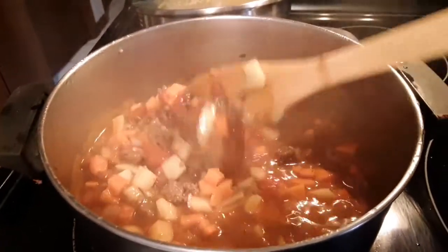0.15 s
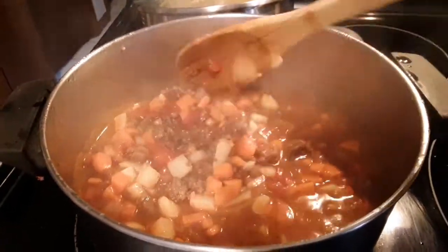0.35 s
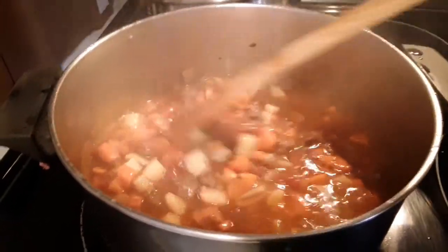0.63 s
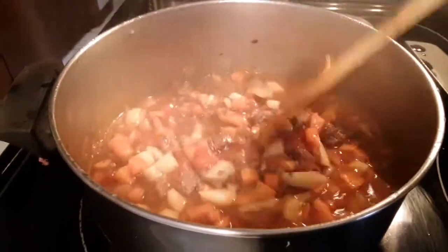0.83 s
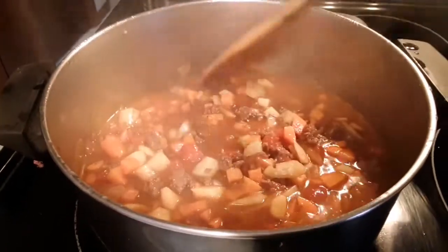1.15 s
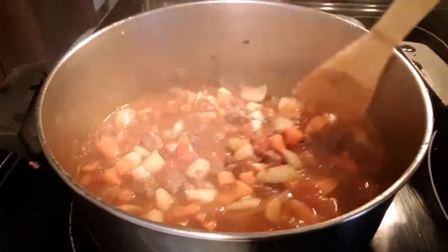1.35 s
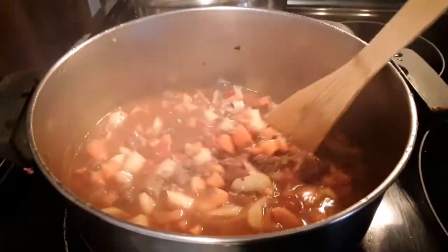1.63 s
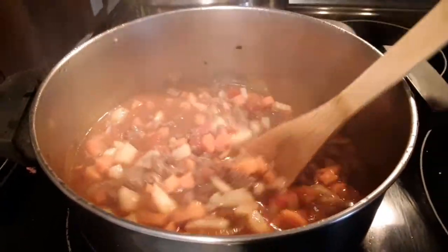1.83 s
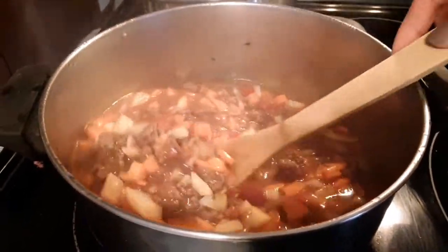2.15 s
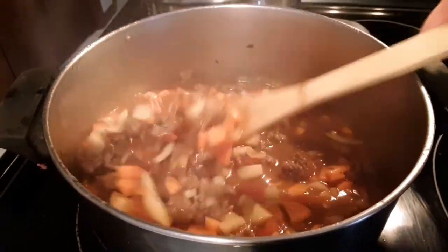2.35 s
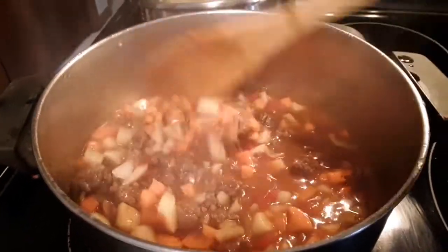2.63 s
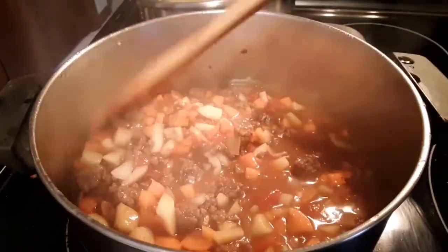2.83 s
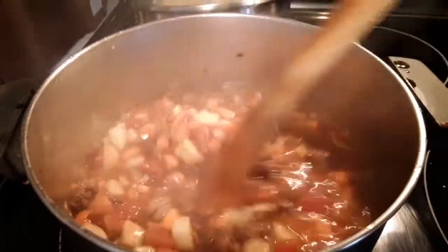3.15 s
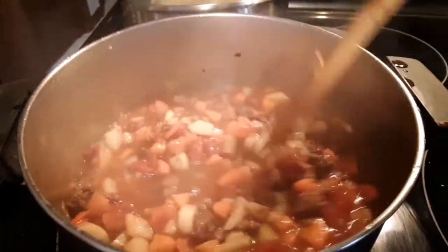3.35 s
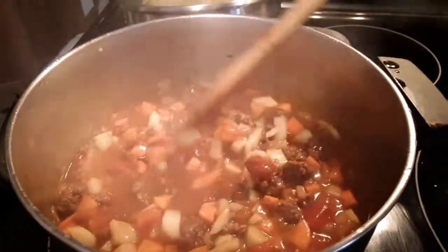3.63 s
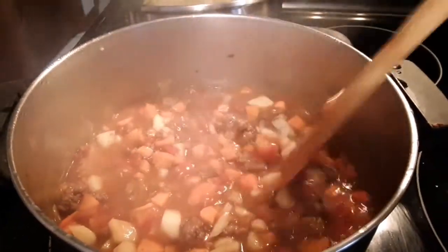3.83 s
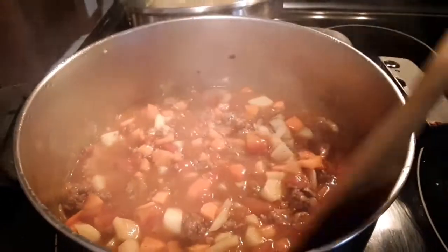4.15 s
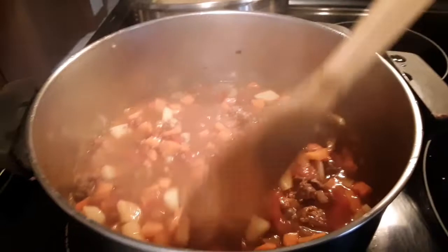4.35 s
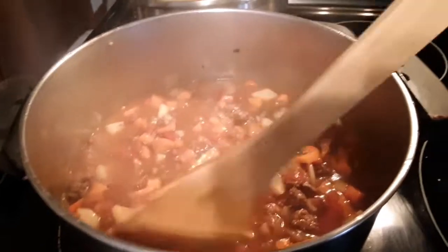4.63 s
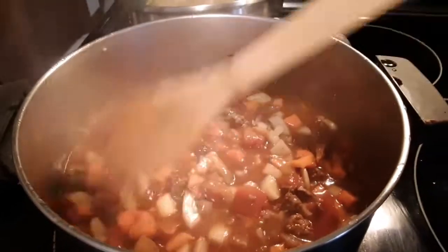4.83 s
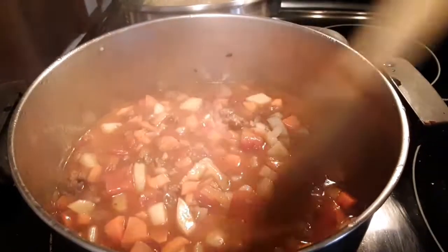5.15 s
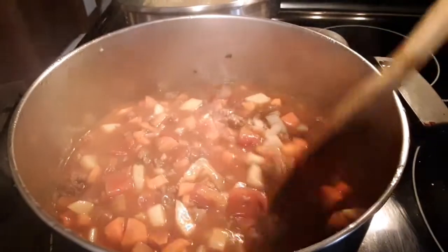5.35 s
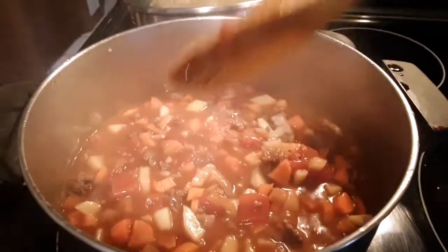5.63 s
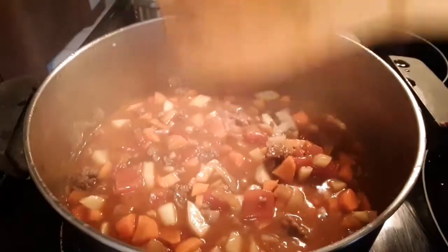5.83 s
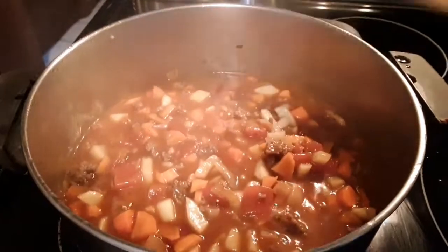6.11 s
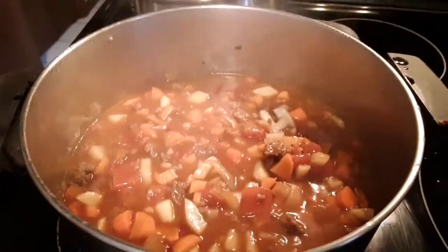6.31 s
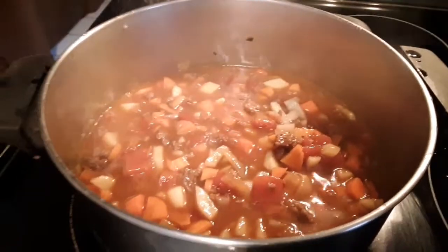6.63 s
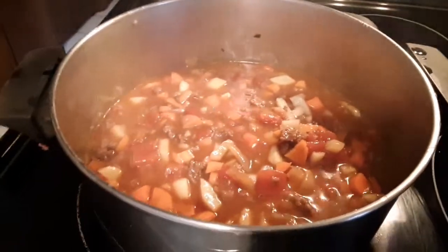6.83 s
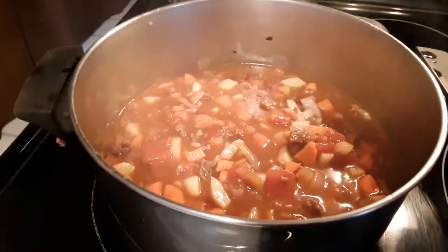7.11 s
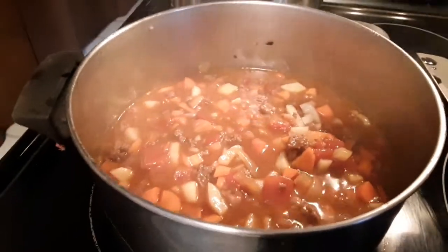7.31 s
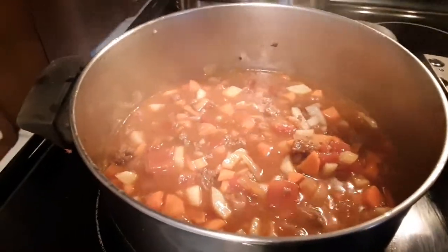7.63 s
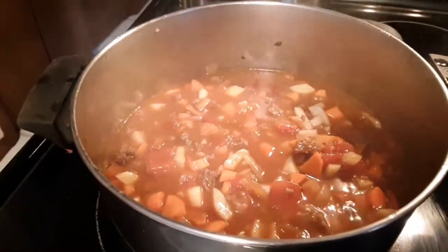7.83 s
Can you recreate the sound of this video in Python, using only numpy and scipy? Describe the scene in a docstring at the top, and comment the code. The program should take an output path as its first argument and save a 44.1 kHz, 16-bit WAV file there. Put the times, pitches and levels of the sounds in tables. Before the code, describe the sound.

A quiet, hollow low boil with a faint hum runs throughout, heard close in stereo in a small kitchen. From 0 to 0.7 s the spoon stirs vigorously: squelching, fizzing stew, a scrape, rounded plops and a dense cluster of wet slaps around 0.2 s, more near 0.7 s. Softer strokes follow with crisp snaps near 1.1 s, a dull pot knock at 1.6 s and a dragging scrape with slaps from 2.2 to 2.7 s. Lighter squelches and plops continue from 3.2 s; at 4.6-4.7 s come a bump, a deep plop and a strong splat. A sharper wooden knock on the pot lands at 5.2 s, then a flurry of snaps and plops around 5.4-5.6 s and a bold plop at 5.75 s. After 6 s only fine simmering pops remain. At 7.53 s a very loud, rattling, hard clatter strikes, heaviest near 7.58 s, ringing briefly to the end.

```python
"""Thick stew on the stove

A steel pot in a kitchen, heard by two microphones: noise and hollow tones make the low boil, over a hum.
Stirring is swelling clouds of tiny rings and noise; plops, film snaps, wet slaps and scrapes come singly.
The wooden spoon bumps the pot's damped modes, and near the end is put down beside it with a loud,
ringing clatter: buzzing contacts and one push drive the many modes of a hard spoon rest."""
import sys
import numpy as np
from scipy import signal
from scipy.fft import rfft, irfft
from scipy.io import wavfile

SR = 44100
rng = np.random.default_rng(int(sys.argv[2]) if len(sys.argv) > 2 else 0)


def bounce(signal):
    """Save signal as a 16-bit WAV file at the path given by the first command-line argument."""
    frames = np.transpose(np.atleast_2d(signal))
    limited = np.clip(frames, -1, 1)
    pcm = np.round(limited * 32767).astype(np.int16)
    wavfile.write(sys.argv[1], SR, pcm)


N = 351477
TIME = np.arange(N) / SR


def from_db(db):
    """Decibels to gain."""
    return 10 ** (np.asarray(db) / 20)


def rms_one(x):
    """Scale to unit rms."""
    return x / np.sqrt(np.mean(x ** 2) + 1e-20)


def peak_one(x):
    """Scale to unit peak."""
    return x / np.abs(x).max()


def at_hz(points, hz):
    """Read a table along log frequency."""
    known_hz, values = np.transpose(points)
    return np.interp(np.log(hz + 1e-3), np.log(known_hz), values)


def fade(t, t60):
    """Exponential decay, 60 dB down after t60 seconds."""
    return np.exp(-np.log(1000) * t / t60)


def burst(t, rise_s, t60):
    """A quick swell that dies away."""
    return (1 - np.exp(-t / rise_s)) * fade(t, t60)


def cut(x, hz, kind, order=2):
    """Butterworth low- or high-pass."""
    sections = signal.butter(order, min(hz, SR / 2 - 1), kind, fs=SR, output="sos")
    return signal.sosfilt(sections, x)


def resonate(x, hz, width_hz):
    """One resonance with gain 1 at its top."""
    r = np.exp(-np.pi * width_hz / SR)
    top = np.array([1, 0, -1]) * (1 - r * r) / 2
    bottom = [1, -2 * r * np.cos(2 * np.pi * hz / SR), r * r]
    return signal.lfilter(top, bottom, x + 1e-18)


def drift(rate):
    """Slow random wander with rms 1, through `rate` random points per second."""
    knots = rng.standard_normal(int(rate * N / SR) + 2)
    return rms_one(np.interp(TIME * rate, np.arange(len(knots)), knots))


def add(out, s, sound):
    """Mix a short stereo sound in at time s."""
    start = int(s * SR)
    out[:, start:start + sound.shape[-1]] += sound[..., :N - start]


def placed(sound, pan_db, lag_s=.00012):
    """A spot in the pot reaches the two microphones at slightly different times and levels."""
    lag = rng.standard_normal() * lag_s * SR  # in samples
    n = np.arange(len(sound))
    pair = []
    for side in (1, -1):  # left, right
        late = np.interp(n - max(side * lag, 0), n, sound, left=0)
        pair.append(from_db(side * pan_db / 2) * late)
    return np.array(pair)


def reverberation(x, t60, dull_hz, delay_s):
    """Dense reflections that die away, unrelated left and right."""
    t = TIME[:int(t60 * SR) + 2]
    noise = cut(rng.standard_normal((2, len(t))), dull_hz, "low", order=1)
    tail = noise * fade(t, t60) * (t > delay_s)
    return signal.fftconvolve(x, tail / np.sqrt(np.sum(tail ** 2) / 2), axes=1)[:, :N]


# how alike the two microphones hear boil and stirring; columns: pitch_hz, correlation
MIC_LIKENESS = [(50, 1), (250, 0.93), (600, 0.38), (1100, 0.29), (2200, 0.21), (4500, 0.084),
                (12000, -0.18)]


def coloured(pair, spectrum):
    """Two unrelated signals become a stereo sound of this spectrum, wider in the treble; rms 1."""
    hz = np.arange(N // 2 + 1) * SR / N
    alike = np.clip(at_hz(MIC_LIKENESS, hz), -1, 1)
    mid, side = rfft(pair) * from_db(at_hz(spectrum, hz))
    both = np.sqrt(1 + alike) * mid + np.sqrt(1 - alike) * side * [[1], [-1]]
    return rms_one(irfft(both, N))


# colour of the low rumble; columns: pitch_hz, relative level_db
RUMBLE_SPECTRUM = [(25, -20.5), (70, -8.5), (100, -7.5), (150, -8.5), (230, -1), (320, -3.5), (400, -10.5),
                   (600, -14), (1000, -25.5), (2000, -23.5), (6000, -41.5)]
# hollow tones of the boil; columns: pitch_hz, width_hz, level_db at the start, change_db_per_s
HOLLOW_TONES = [(138.5, 5, -60.5, 0), (226, 37, -57.5, -0.73), (342.9, 6.8, -56, -1.16)]


def boil(rumble_db=-53.0, surge_db=0.5, tone_surge_db=-0.5, hum_hz=56.4, hum_db=-57.5):
    """Vapour collapsing deep in the pot rumbles and wakes a few hollow tones; a low hum lies under it."""
    rumble = coloured(rng.standard_normal((2, N)), RUMBLE_SPECTRUM)
    bed = from_db(rumble_db + surge_db * drift(6.5)) * rumble
    for hz, width_hz, db, db_per_s in HOLLOW_TONES:
        tone = rms_one(resonate(rng.standard_normal(N), hz, width_hz))
        bed = bed + from_db(db + db_per_s * TIME + tone_surge_db * drift(3.08)) * tone
    hum = np.sqrt(2) * np.sin(2 * np.pi * hum_hz * TIME)
    return bed + from_db(hum_db) * hum


# the simmer under the strokes, its first level held until the first row; columns: time_s, level_db
SIMMER_LEVEL = [(5.9, -73.5), (6.482, -74), (6.626, -78), (6.818, -69.5), (7.298, -73), (7.9, -73.5)]
# the spoon moving through the stew; columns: start_s, length_s, squelch level_db, wet fizz level_db
SPOON_STROKES = [(0.0, 0.26, -52, -56.5), (0.17, 0.032, -52, -58), (0.404, 0.042, -51.5, -63),
                 (0.595, 0.075, -57, -58.5), (1.019, 0.51, -60, -65), (1.611, 0.058, -58, -59.5),
                 (1.76, 0.47, -63.5, -63.5), (2.235, 0.19, -58.5, -62), (2.376, 0.32, -67, -60.5),
                 (2.892, 0.073, -59.5, -68), (3.24, 0.46, -64, -75), (4.197, 0.23, -62.5, -67),
                 (4.588, 0.081, -52.5, -57.5), (5.18, 0.031, -67.5, -54.5), (5.4, 0.13, -59.5, -71),
                 (5.714, 0.13, -62, -69)]


def agitation(simmer_squelch_db=6, simmer_fizz_db=2.5, attack_s=0.015, settle_s=0.72):
    """Gains of squelch and fizz: every stroke bites in, holds and settles on top of the simmer."""
    simmer_db = np.interp(TIME, *np.transpose(SIMMER_LEVEL))
    power = from_db([simmer_db + simmer_squelch_db, simmer_db + simmer_fizz_db]) ** 2
    for s, length_s, squelch_db, fizz_db in SPOON_STROKES:
        bite = np.clip((TIME - s) / attack_s, 0, 1)
        swell = bite * fade(np.clip(TIME - s - length_s, 0, None), settle_s)
        power += (from_db([[squelch_db], [fizz_db]]) * swell) ** 2
    return np.sqrt(power)


def grains(per_s, spread_db, low_hz, high_hz, cycles, count=16):
    """Tiny bubbles of random size and pitch, each ringing for a few cycles; two unrelated signals."""
    born = rng.random((2, N)) < per_s * from_db(4 * drift(14)) / SR  # the rate wanders
    size_db = spread_db * np.minimum(rng.exponential(1, (2, N)), 4.5)
    sizes = born * from_db(size_db) * rng.choice([-1, 1], (2, N))
    dealt = rng.integers(0, count, (2, N))  # which pitch each bubble gets
    pitches_hz = np.geomspace(low_hz, min(high_hz, SR / 2 - 1), count)
    return rms_one(sum(resonate(sizes * (dealt == k), hz, 2 * hz / cycles)
                       for k, hz in enumerate(pitches_hz)))


# colours given to the stew's squelch and its wet fizz; columns of both: pitch_hz, relative level_db
SQUELCH_SPECTRUM = [(300, -2.5), (600, -0.5), (850, 1), (1250, -4), (1480, -14.5), (1900, -3), (2500, -7),
                    (3400, -12.5), (6000, -41)]
FIZZ_SPECTRUM = [(1800, 10.5), (3000, -1), (4200, 4.5), (5500, 5), (7000, 7), (8500, -5), (11000, -6.5),
                 (13000, -3.5)]


def stirring(squelch_db=2.5, fizz_db=3.0, wash=0.96, hiss=1.0, ragged_db=2.5):
    """Countless small bursts in ragged swells, stronger while the spoon turns the stew over."""
    squelch_gain, fizz_gain = agitation()
    squelch = grains(per_s=330, spread_db=4.6, low_hz=600, high_hz=3400, cycles=10)
    squelch = squelch + wash * rng.standard_normal((2, N))
    fizz = grains(per_s=350, spread_db=4.3, low_hz=2800, high_hz=12500, cycles=10, count=24)
    fizz = fizz + hiss * rng.standard_normal((2, N))
    swell_db = ragged_db * drift(25)
    low_layer = squelch_gain * from_db(squelch_db + swell_db) * coloured(squelch, SQUELCH_SPECTRUM)
    high_layer = fizz_gain * from_db(fizz_db + swell_db) * coloured(fizz, FIZZ_SPECTRUM)
    return low_layer + high_layer


# the full steel pot, damped by the stew; columns: pitch_hz, width_hz, level_db
POT_RESONANCES = [(128, 30, 0.5), (207, 30, 7), (295, 45, -1), (386, 35, -2.5), (490, 90, -5),
                  (720, 350, 0), (846, 61, 9.5), (1152, 34, 5.5), (1224, 110, 6), (1458, 50, 0),
                  (1730, 150, 1), (1950, 102, 7), (2330, 300, -3), (3850, 700, -2), (6800, 2800, -13)]


def pot_body(push):
    """The pot's damped modes answer a push, with alternating sign."""
    return sum((-1) ** k * from_db(db) * resonate(push, hz, width_hz)
               for k, (hz, width_hz, db) in enumerate(POT_RESONANCES))


# spoon dragging over the bottom of the pot; columns: start_s, length_s, level_db
SPOON_SCRAPES = [(0.043, 0.29, -53), (1.63, 0.083, -55), (2.23, 0.465, -58.5), (4.604, 0.14, -63)]


def scrapes(slips_per_s=240, slip_spread_db=5, low_hz=750, high_hz=3200, pressure_db=3.5, edge_s=0.052):
    """The dragged spoon sticks and slips under uneven pressure, ticking the pot's modes."""
    slip_sizes = from_db(slip_spread_db * rng.standard_normal((2, N)))
    slips = (rng.random((2, N)) < slips_per_s / SR) * slip_sizes
    band = cut(cut(slips, low_hz, "high", order=4), high_hz, "low")
    rasp = rms_one(pot_body(band))
    drag = np.zeros(N)
    for s, length_s, db in SPOON_SCRAPES:
        to_edge_s = np.minimum(TIME - s, s + length_s - TIME)
        drag += from_db(db) * np.clip(to_edge_s / edge_s, 0, 1)  # fades in and out
    return drag * from_db(pressure_db * drift(40)) * rasp


# loud snaps of wet films; columns: start_s, level_db (before the trim), pitch_hz
FILM_SNAPS = [(0.016, -37, 6300), (0.3531, -36, 4930), (0.463, -41.5, 7300), (0.523, -43.5, 4650),
              (1.036, -39, 5100), (1.077, -42, 5100), (1.1364, -36, 6860), (1.195, -35, 5460),
              (1.3137, -40, 6540), (2.49, -33, 6900), (2.785, -41, 5500), (2.938, -45.5, 5550),
              (2.994, -42, 6900), (3.068, -44.5, 7400), (3.0995, -39, 7200), (3.146, -37, 4450),
              (3.3073, -38.5, 6150), (3.4878, -39, 6160), (3.5184, -45, 4600), (3.5407, -44, 3040),
              (3.6522, -41, 6400), (3.858, -38, 7900), (3.969, -45.5, 7420), (4.0951, -39, 5850),
              (4.1147, -44, 3600), (4.1906, -43, 7400), (4.2971, -40.5, 4800), (4.323, -27, 5450),
              (4.568, -50, 3370), (4.6927, -28.5, 3700), (5.2819, -41, 6250), (5.301, -40, 5500),
              (5.3748, -32.5, 5400), (5.3903, -35, 3800), (5.42, -31.5, 6140), (5.443, -34.5, 7300),
              (5.464, -35, 7100), (5.501, -46, 3480), (5.553, -42, 5240), (5.922, -32.5, 6630),
              (6.0828, -37, 6800), (6.1637, -38, 5170), (6.205, -39.5, 5170), (6.323, -46, 6100),
              (6.419, -43.5, 7000), (6.5832, -39, 6760), (6.6397, -40, 7100), (6.6653, -41, 7580),
              (6.6815, -38, 6360), (6.7116, -40, 4340), (6.778, -43, 4220), (6.8319, -42.5, 6300),
              (6.843, -41, 4700), (6.9292, -40, 4260), (6.9546, -36, 5560), (6.997, -45, 5200),
              (7.096, -44, 4770), (7.1277, -41, 5200), (7.137, -42.5, 4330), (7.148, -34.5, 5240),
              (7.163, -47, 3400), (7.176, -37.5, 4600)]


def snaps(opening_s=0.0016, tear_s=0.0096, crack=1.18, width=0.24, spray=0.14, spray_hz=5000,
          ring=2.1, ring_width=0.035, trim_db=3.0, left_db=1.2, left_spread_db=-0.5):
    """A film tears with a few ms of bright spray around one sharp tick; its tiny cavity rings."""
    out, t = np.zeros((2, N)), TIME[:SR // 25]
    tick = signal.unit_impulse(len(t), int(opening_s * SR))
    for s, db, hz in FILM_SNAPS:
        pan_db = left_db + left_spread_db * rng.standard_normal()  # left minus right
        tear = rng.standard_normal(len(t)) * burst(t, opening_s, tear_s) + crack * tick
        snap = resonate(tear, hz, width * hz)
        snap = snap + spray * cut(tear, spray_hz, "high")
        snap = snap + ring * resonate(tick, hz, ring_width * hz)
        add(out, s, from_db(db + trim_db) * placed(peak_one(snap), pan_db))
    return out


def small_plops(per_s=2.5, level_db=-48, spread_db=4, pitch_hz=1170, spread_octaves=0.42, cycles=13):
    """Small bubbles open at random moments; rows as in BIG_PLOPS."""
    times = np.flatnonzero(rng.random(N) < per_s / SR) / SR
    chances = rng.standard_normal((len(times), 2))
    return [(s, level_db + spread_db * size, pitch_hz * 2 ** (spread_octaves * pitch), cycles)
            for s, (size, pitch) in zip(times, chances)]


# big bubbles opening at the surface; columns: start_s, level_db (before the trim), pitch_hz, ring_cycles
BIG_PLOPS = [(0.083, -33, 1740, 18), (0.331, -37.5, 1200, 5.2), (0.401, -34.5, 1330, 10),
             (0.457, -32, 1460, 15), (0.466, -36.5, 1270, 8), (0.548, -41, 1070, 9),
             (0.584, -35.5, 1213, 19), (0.641, -37.5, 1730, 16), (0.681, -32.5, 1200, 10),
             (0.924, -36.5, 910, 6.5), (1.094, -36, 1610, 10), (1.194, -34.5, 1130, 3.9),
             (1.375, -34, 1150, 7.1), (1.385, -36, 1960, 39), (1.676, -37, 1260, 18),
             (1.804, -40, 1760, 76), (2.288, -42.5, 990, 7.2), (2.416, -35.5, 1410, 4.4),
             (2.458, -40, 810, 9), (2.625, -43, 920, 11), (2.682, -37.5, 930, 9.8), (3.346, -34, 1290, 11),
             (3.359, -45, 1450, 14), (3.389, -43, 1200, 12), (3.402, -30.5, 1234, 15),
             (3.895, -35, 2160, 11), (4.273, -35, 1140, 6.1), (4.592, -26, 860, 15),
             (4.787, -35.5, 1780, 14), (5.01, -35.5, 1960, 7.1), (5.419, -34, 795, 15),
             (5.46, -40.5, 1370, 13), (5.473, -35, 1780, 30), (5.52, -40, 1900, 68), (5.527, -45, 1300, 41),
             (5.567, -32.5, 1316, 37), (5.578, -42, 1930, 150), (5.581, -41.5, 1260, 82),
             (5.747, -24.5, 1760, 15), (6.672, -42, 1460, 15), (6.681, -37.5, 1810, 25),
             (6.774, -37.5, 1970, 23), (6.782, -42, 1190, 12), (7.135, -40, 970, 5.8),
             (7.174, -45, 1300, 14), (7.389, -30.5, 2070, 11)]


def plops(rise=0.064, opening_s=0.0007, wet_db=-13, pop=1.64, pop_width=0.43, trim_db=1.0,
          left_db=3, left_spread_db=2):
    """A bubble's cavity rings as its cap opens, rising a little in pitch."""
    out, t = np.zeros((2, N)), TIME[:SR // 16]
    cap = signal.unit_impulse(len(t), int(opening_s * SR))
    for s, db, hz, cycles in BIG_PLOPS + small_plops():
        pan_db = left_db + left_spread_db * rng.standard_normal()  # left minus right
        life_s = cycles / hz
        glide = 1 + rise * (np.minimum(t / life_s, 1) - .25)
        tone = np.sin(2 * np.pi * hz * np.cumsum(glide) / SR)
        wet = rms_one(resonate(rng.standard_normal(len(t)), hz, hz))
        plop = (tone + from_db(wet_db) * wet) * burst(t, opening_s, life_s)
        plop = plop + pop * resonate(cap, hz, pop_width * hz)  # the cap gives way
        add(out, s, from_db(db + trim_db) * placed(peak_one(plop), pan_db))
    return out


def trapped_air(t, hz, length_s, spread_octaves=0.58, cycles=18.0, rise=0.14, count=7):
    """A handful of bubbles around one pitch, born at random moments, each chirping upward; peak 1."""
    out = 0
    for when, pitch, size in rng.random((count, 3)):
        age = np.maximum(t - when * length_s, 0)
        bubble_hz = hz * 2 ** (spread_octaves * (2 * pitch - 1))
        life_s = cycles / bubble_hz
        chirp = np.sin(2 * np.pi * bubble_hz * age * (1 + rise * age / life_s))
        out = out + size * chirp * fade(age, life_s)
    return peak_one(out)


# lumps of stew slapping down; columns: start_s, level_db (before the trim), pitch_hz, length_s
STEW_SPLATS = [(0.122, -21.5, 2400, 0.027), (0.207, -17, 2230, 0.017), (0.2175, -14.5, 2170, 0.022),
               (0.226, -25, 1700, 0.019), (0.236, -23, 3800, 0.016), (0.244, -15, 2770, 0.0176),
               (0.269, -17.5, 3030, 0.023), (0.658, -25.5, 2280, 0.016), (0.693, -18.5, 2510, 0.018),
               (0.703, -27, 2610, 0.014), (1.386, -34, 2310, 0.015), (2.143, -32, 2280, 0.022),
               (2.235, -35, 3400, 0.031), (2.275, -34, 1490, 0.035), (2.396, -31, 3500, 0.014),
               (2.4, -23.5, 4560, 0.02), (3.244, -23.5, 2400, 0.025), (3.419, -33, 3200, 0.03),
               (3.253, -27.5, 3160, 0.02), (3.551, -24, 1700, 0.01), (4.67, -31, 2730, 0.03),
               (4.692, -11, 2400, 0.016), (5.418, -20, 2060, 0.0081), (5.748, -34, 3600, 0.012)]


def splats(landing_s=0.0012, crack=4.2, width=0.46, spray=0.12, air_db=-15, air_pitch=0.6,
           air_delay=0.5, trim_db=-5, pan_db=0.0):
    """A lump lands with a broad wet slap, throws spray and drags air under."""
    out, t = np.zeros((2, N)), TIME[:SR // 12]
    tick = signal.unit_impulse(len(t), int(landing_s * SR))
    for s, db, hz, length_s in STEW_SPLATS:
        slap = rng.standard_normal(len(t)) * burst(t, landing_s, length_s) + crack * tick
        slap = cut(resonate(slap, hz, width * hz) + spray * slap, 10300, "low")
        air = trapped_air(t, air_pitch * hz, air_delay * length_s)
        splat = peak_one(slap) + from_db(air_db) * air
        add(out, s, from_db(db + trim_db) * placed(splat, pan_db))
    return out


# spoon bumping the pot; columns: start_s, level_db, hardness_hz, scuff_s
POT_BUMPS = [(1.5896, -24, 2800, 0.025), (1.597, -33, 150, 0.091), (1.611, -32.5, 150, 0.052),
             (3.401, -34, 1490, 0.028), (4.5892, -27.5, 1700, 0.041), (5.186, -17, 5500, 0.015),
             (5.191, -32.5, 150, 0.19)]


def bumps(scuff=0.14, pan_db=0.0):
    """Wood meets steel through the stew: one push and a short scuff into the damped modes."""
    out, t = np.zeros((2, N)), TIME[:SR // 5]
    for s, db, hard_hz, scuff_s in POT_BUMPS:
        rub = scuff * rng.standard_normal(len(t)) * fade(t, scuff_s)
        push = cut(signal.unit_impulse(len(t)) + rub, hard_hz, "low", order=1)
        add(out, s, from_db(db) * placed(peak_one(pot_body(push)), pan_db))
    return out


# spoon rattling down on its rest; columns: start_s, level_db, pitch_hz, relative bandwidth, length_s
SPOON_CONTACTS = [(7.5298, -6, 6400, 0.21, 0.029), (7.5303, -9.5, 2120, 0.78, 0.03),
                  (7.5305, -4, 4420, 0.052, 0.028), (7.543, -12, 1760, 0.59, 0.061),
                  (7.546, -14, 3450, 0.15, 0.044), (7.554, -4.5, 1990, 0.27, 0.046),
                  (7.568, 0, 2210, 0.34, 0.036), (7.576, -3.5, 3370, 0.46, 0.049),
                  (7.583, -5, 1630, 0.21, 0.068), (7.591, -14.5, 3070, 1, 0.1),
                  (7.604, -13.5, 2620, 0.43, 0.024), (7.633, -22, 2820, 0.84, 0.056)]
# the hard spoon rest; columns: pitch_hz, width_hz, level_db
REST_RESONANCES = [(846, 30, 12), (910, 35, 0), (965, 35, 1), (1030, 45, -3), (1195, 25, 0), (1250, 30, -1),
                   (1305, 28, 2), (1350, 35, -1), (1435, 25, -3), (1505, 32, 0), (1560, 35, -2),
                   (1645, 45, 1), (1732, 26, 1), (1790, 30, -5), (1840, 26, -1), (1875, 26, 1),
                   (1928, 25, -2), (2000, 30, -5), (2055, 30, -4), (2135, 30, -4), (2217, 36, 2),
                   (2303, 30, 1), (2425, 32, 1.5), (2515, 18, -1), (2756, 12, 5), (2825, 18, -1),
                   (2873, 22, 4), (2906, 22, 7), (3060, 50, -6), (3270, 24, 0), (3325, 24, 3),
                   (3395, 26, 3), (3485, 22, 1), (3540, 22, 2), (3615, 20, 2), (3743, 20, 1), (3805, 24, 3),
                   (4090, 26, -4), (4160, 22, -1), (4265, 20, -1), (4320, 24, -2), (4523, 30, 2),
                   (4660, 36, -2), (4790, 28, -3), (4895, 32, -2), (5130, 35, -4), (5345, 30, -4),
                   (5560, 50, -6), (5740, 30, -6), (5910, 45, -4), (6312, 20, 2), (6490, 60, -6),
                   (6790, 70, -2), (6950, 50, -6), (7115, 40, -3), (8280, 70, -4), (8770, 60, -9),
                   (9190, 40, -7), (10400, 220, -6), (11250, 150, -9)]
# its modes reach the two microphones together or in opposition; columns: pitch_hz, correlation
REST_MIC_LIKENESS = [(950, 0.77), (1220, -0.42), (1480, -0.35), (1660, 0.38), (2300, 0.65), (2900, 0.41),
                     (3200, -0.56), (3850, -0.7), (4150, 0.25), (4900, 0.27), (5200, -0.3), (6400, -0.48),
                     (7000, 0.3)]


def clatter(rise_s=0.00095, ring_db=-0.76, wood_db=-31, thud_db=-27, thud_hz=400, centre_hz=1100,
            pan_db=1.6, pan_db_per_octave=-1.3, landing_s=7.582, landing_db=14.5, landing_hz=1000):
    """The spoon chatters and lands; buzzing contacts feed the rest's modes and thud into the stove top."""
    force, t = np.zeros((2, N)), TIME[:SR // 8]
    for s, db, hz, bandwidth, length_s in SPOON_CONTACTS:
        buzz = rms_one(resonate(rng.choice([-1., 1.], (2, len(t))), hz, bandwidth * hz))
        add(force, s, from_db(db) * buzz * burst(t, rise_s, length_s))
    # the spoon's full weight comes down in one soft push
    weight = signal.unit_impulse(N, int(landing_s * SR)) + 1e-18
    landing = from_db(landing_db) * cut(weight, landing_hz, "low", order=4)
    ring, together, opposed = 0, force[0], force[1] * [[1], [-1]]
    for hz, width_hz, db in REST_RESONANCES:
        left_db = pan_db + pan_db_per_octave * np.log2(hz / centre_hz)  # high modes radiate to the right
        alike = np.clip(at_hz(REST_MIC_LIKENESS, hz), -1, 1)
        drive = np.sqrt((1 + alike) / 2) * (together + landing) + np.sqrt((1 - alike) / 2) * opposed
        gain = from_db([[db + left_db / 2], [db - left_db / 2]])
        ring = ring + gain * resonate(drive, hz, width_hz)
    thud = cut(cut(np.cumsum(together), 87, "high"), thud_hz, "low", order=4)
    contact = from_db(ring_db) * ring + from_db(wood_db) * force
    return cut(contact, 11700, "low", order=8) + from_db(thud_db) * thud


def scene():
    """Stew sounds echo in the pot, then they and the spoon ring in the kitchen; the boil is added dry."""
    stew = plops() + snaps() + splats() + bumps() + scrapes() + stirring()
    stew = stew + from_db(-10.0) * reverberation(stew, t60=.05, dull_hz=6300, delay_s=0.0013)
    stew = stew + from_db(-19.5) * reverberation(stew, t60=0.27, dull_hz=5500, delay_s=0.013)
    spoon = clatter()
    spoon = spoon + from_db(-14.0) * reverberation(spoon, t60=.32, dull_hz=8100, delay_s=0.01)
    left_db = 2.5  # the pot leans left: left minus right
    return (stew + boil()) * from_db([[left_db / 2], [-left_db / 2]]) + spoon


def record(dry, cutoff_hz=14900):
    """The loudest peaks are rounded; the treble rolls off and is cut."""
    dulled = cut(np.tanh(dry), 11220, "low", order=4)
    return signal.sosfilt(signal.cheby2(12, 70, cutoff_hz, fs=SR, output="sos"), dulled)


dry = scene()
out = record(dry)
bounce(out)
```